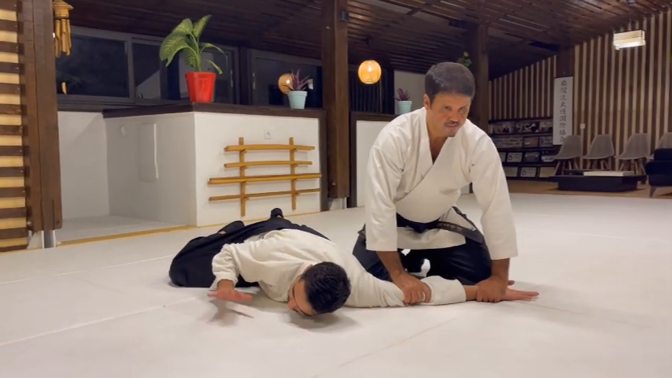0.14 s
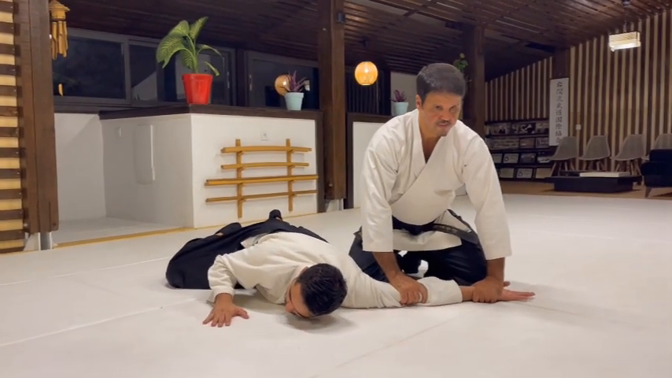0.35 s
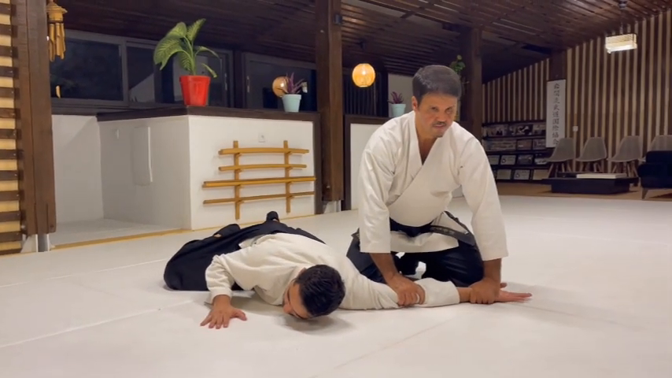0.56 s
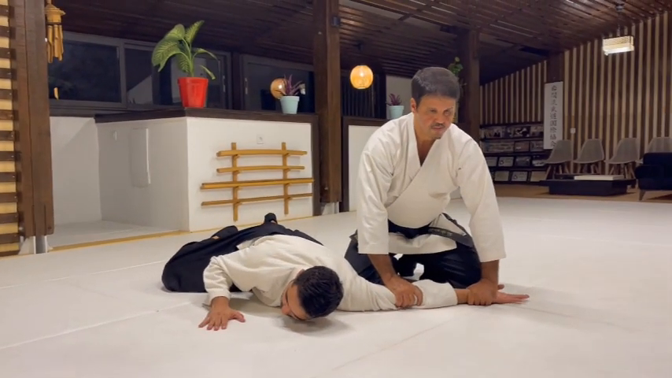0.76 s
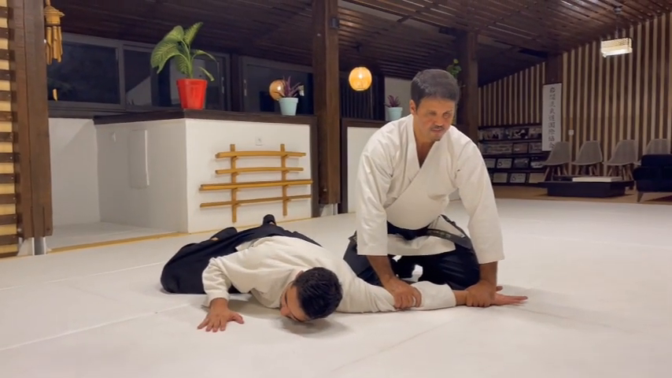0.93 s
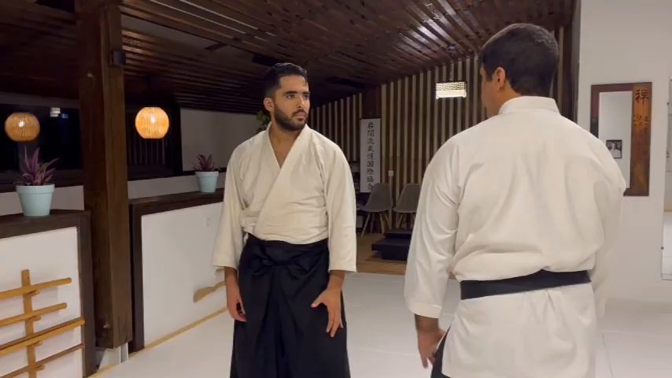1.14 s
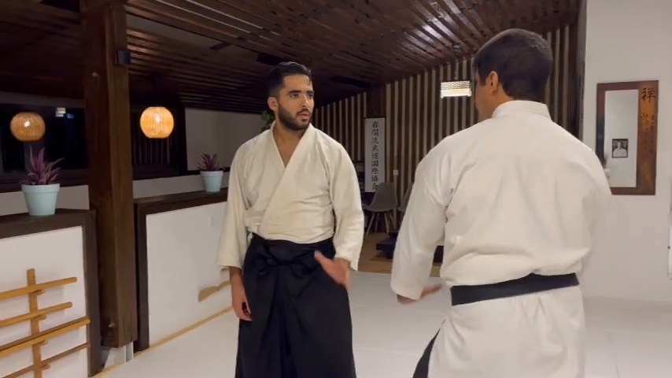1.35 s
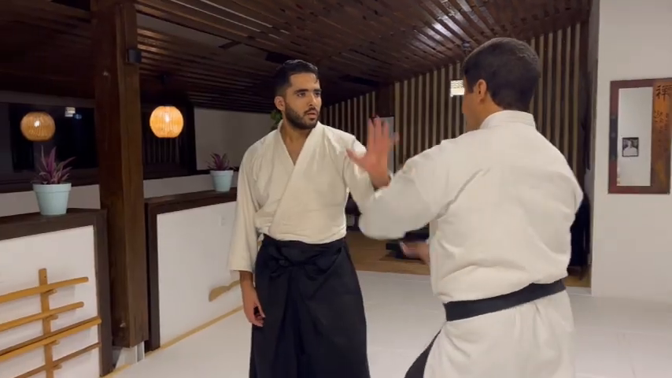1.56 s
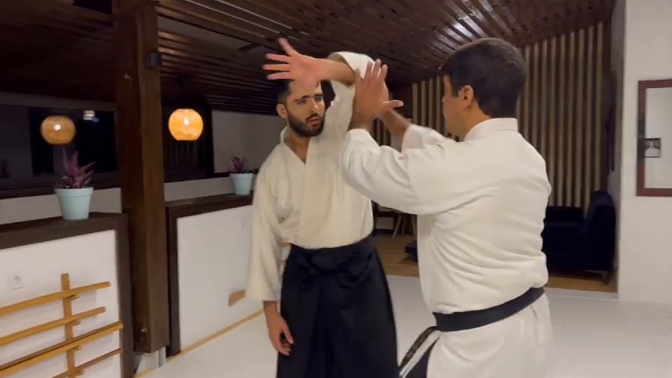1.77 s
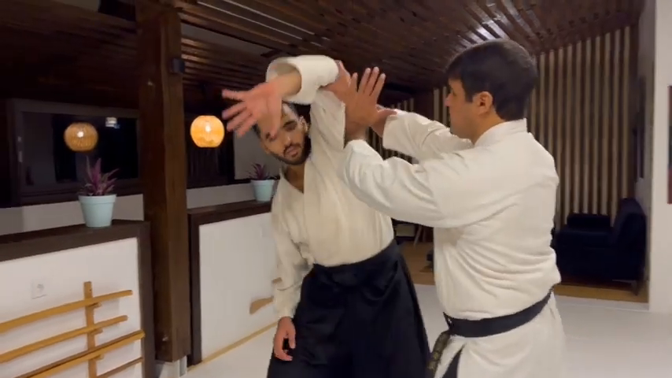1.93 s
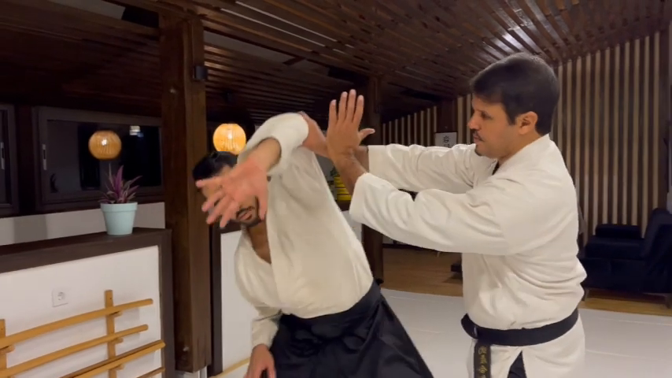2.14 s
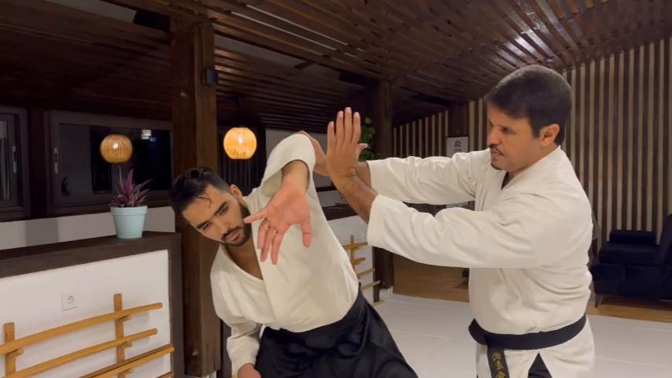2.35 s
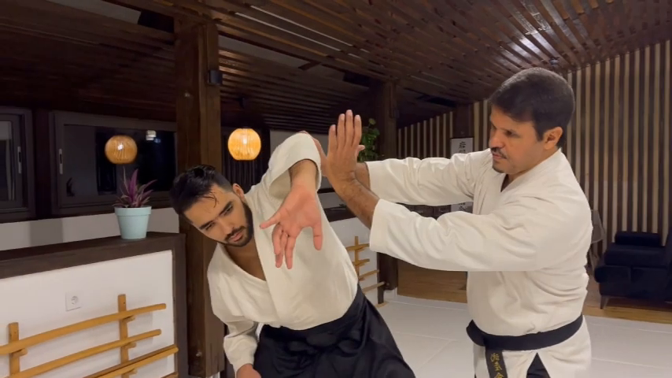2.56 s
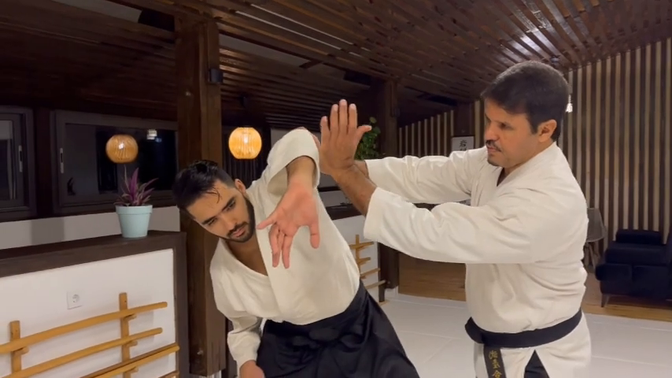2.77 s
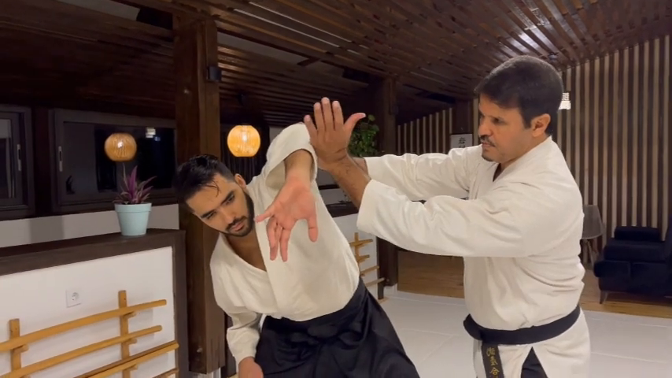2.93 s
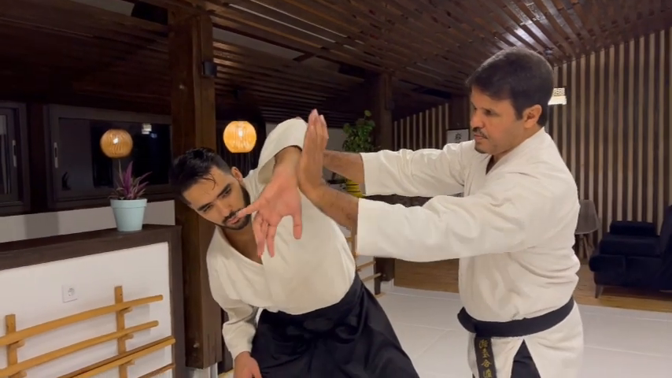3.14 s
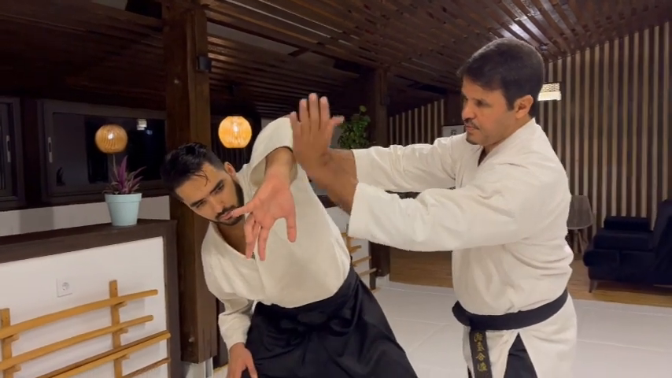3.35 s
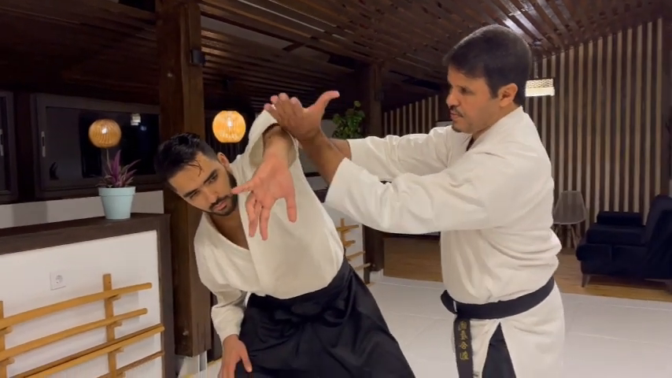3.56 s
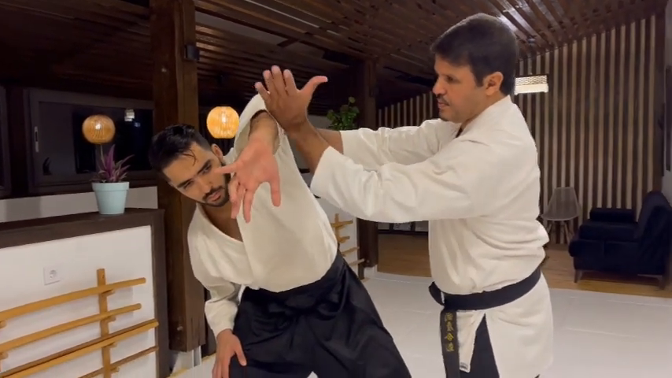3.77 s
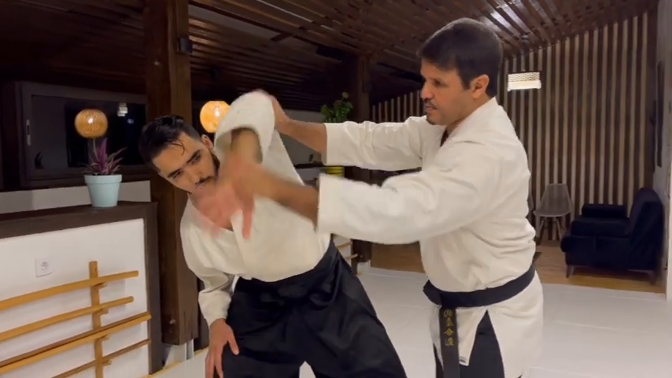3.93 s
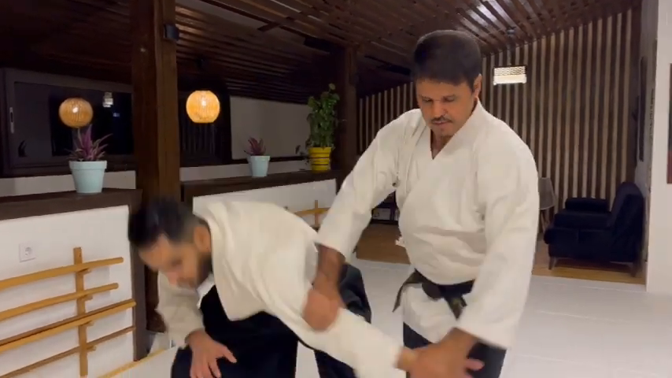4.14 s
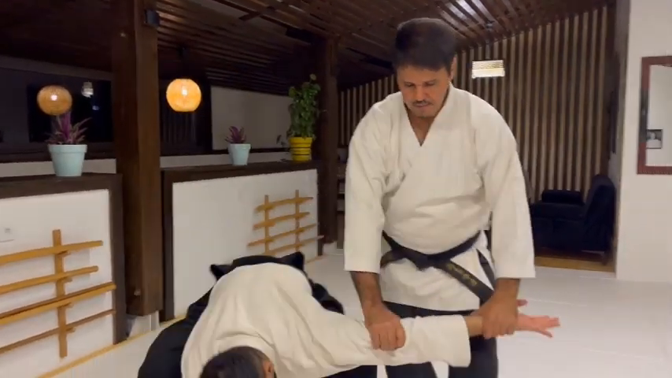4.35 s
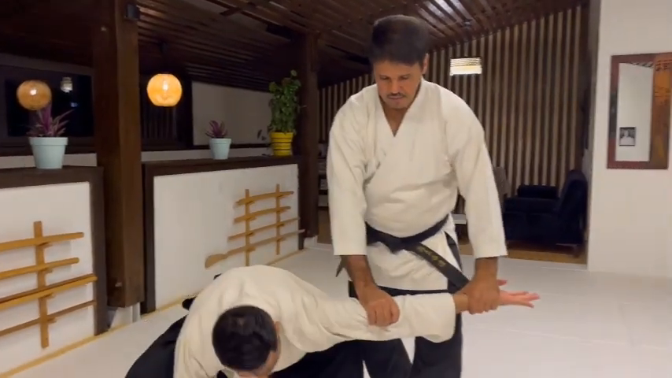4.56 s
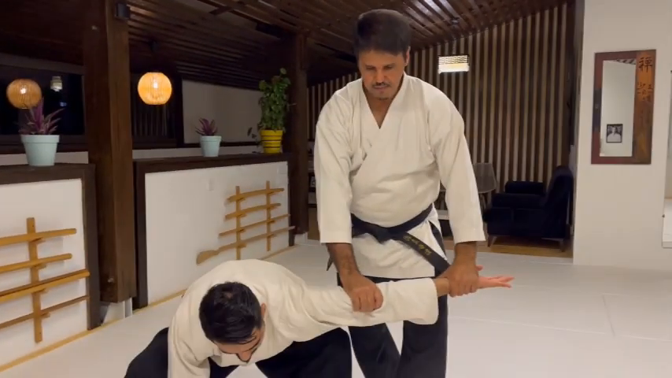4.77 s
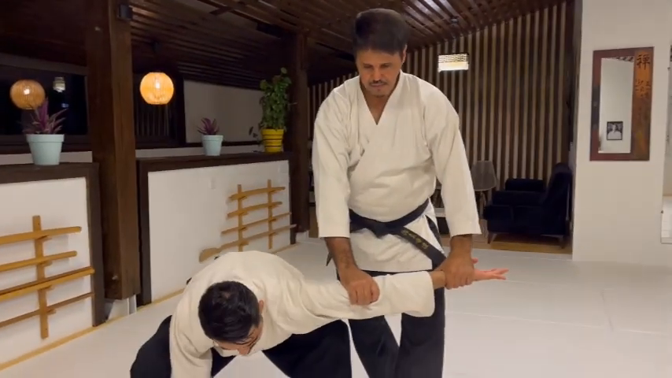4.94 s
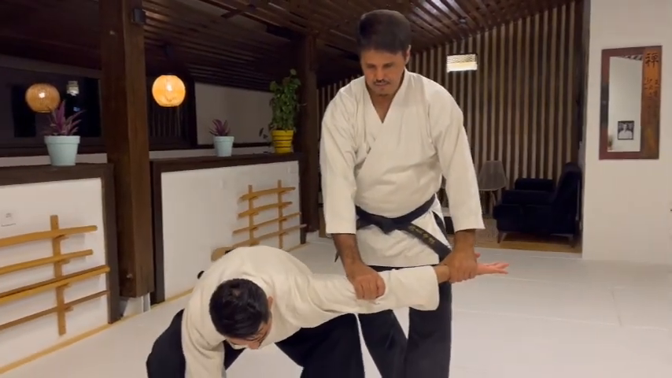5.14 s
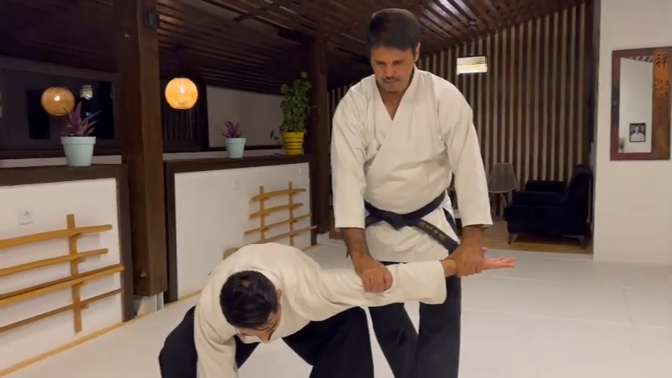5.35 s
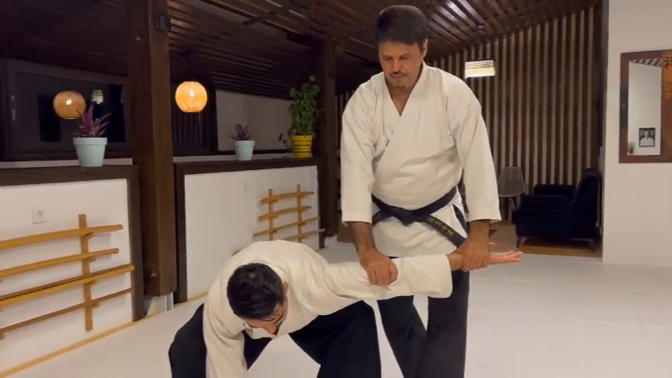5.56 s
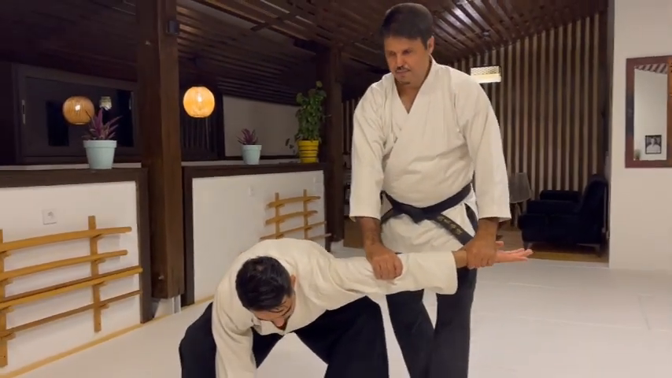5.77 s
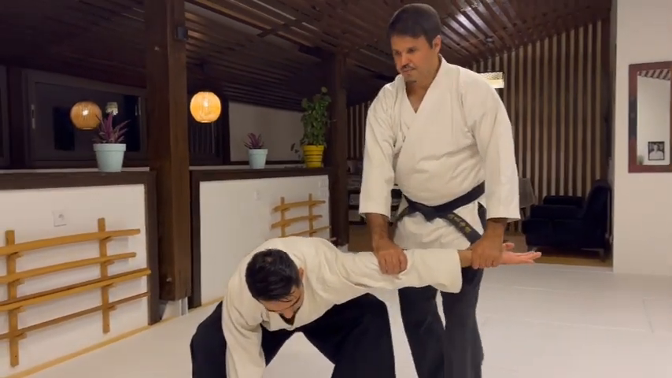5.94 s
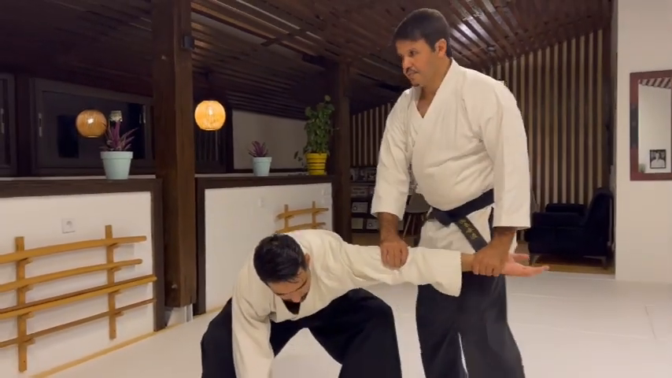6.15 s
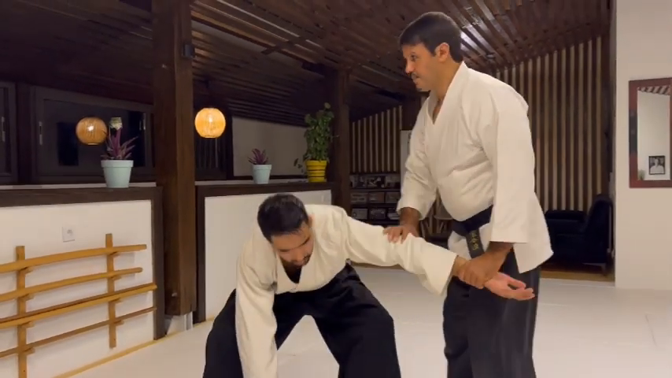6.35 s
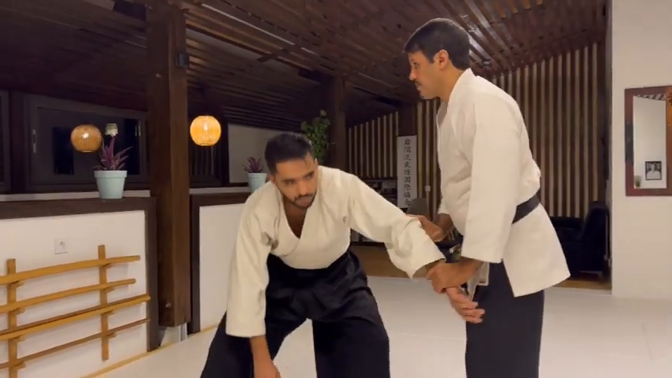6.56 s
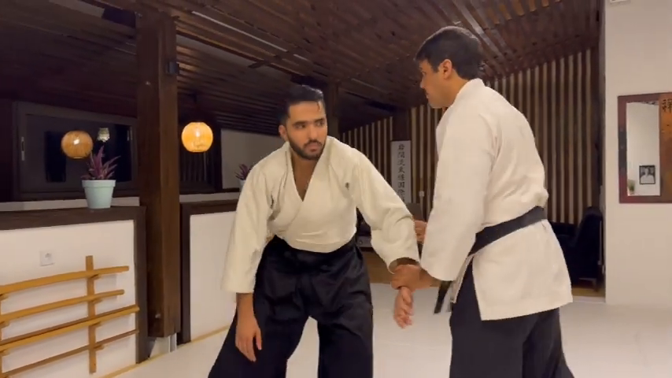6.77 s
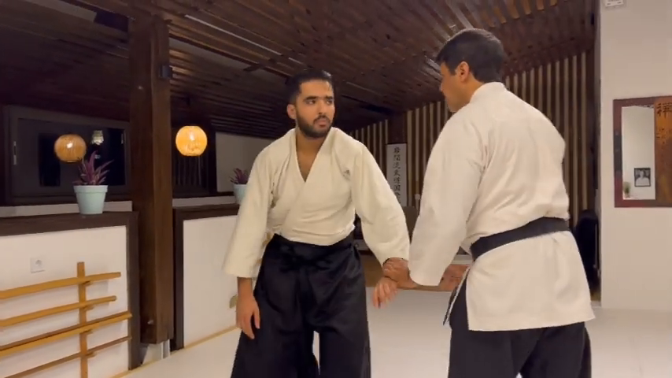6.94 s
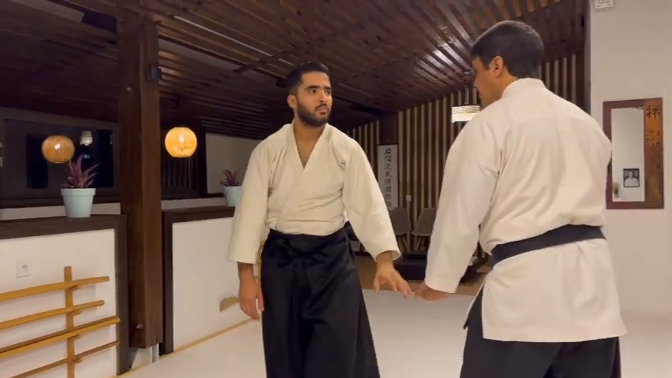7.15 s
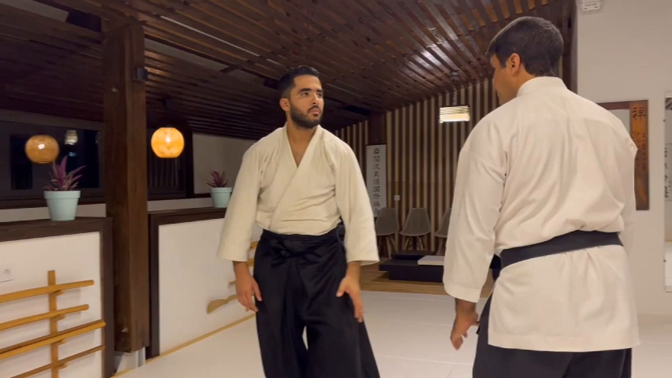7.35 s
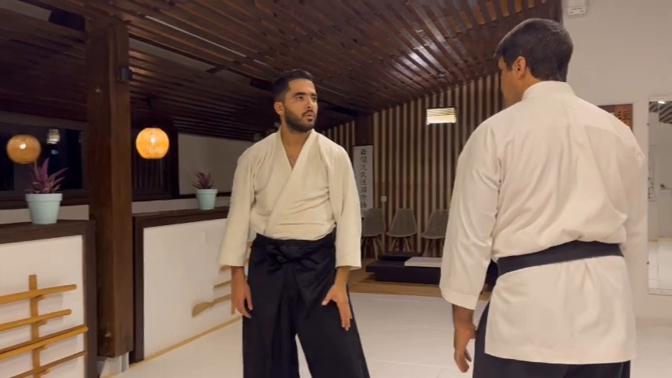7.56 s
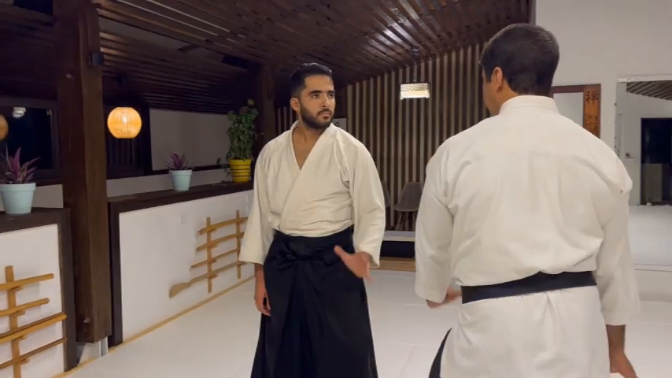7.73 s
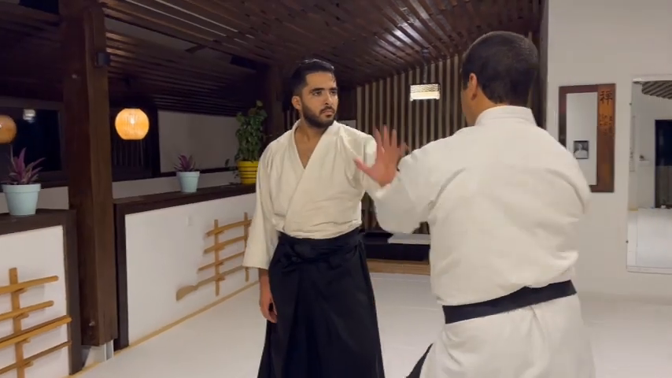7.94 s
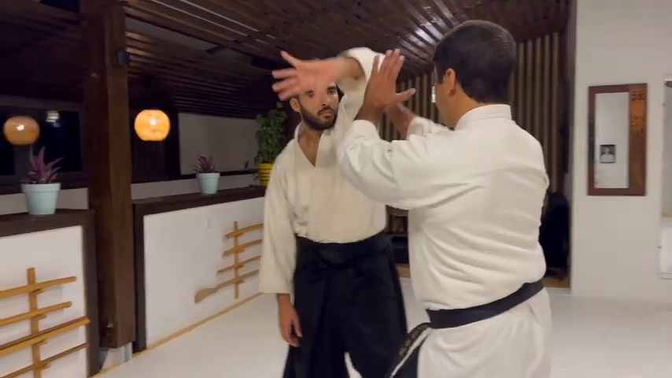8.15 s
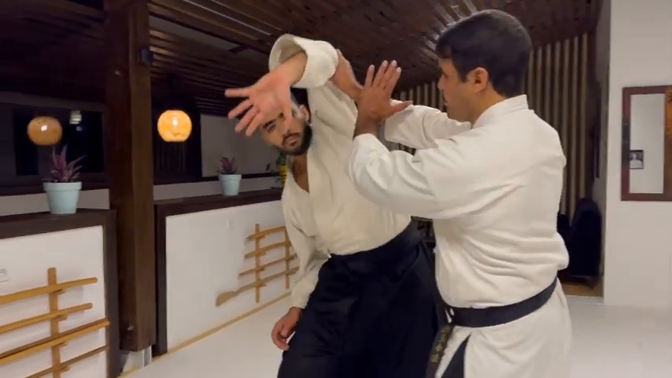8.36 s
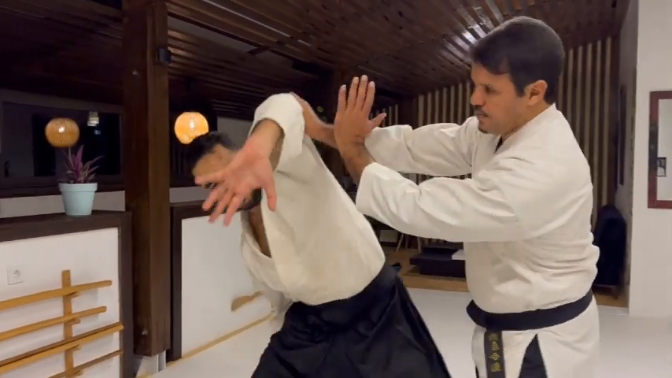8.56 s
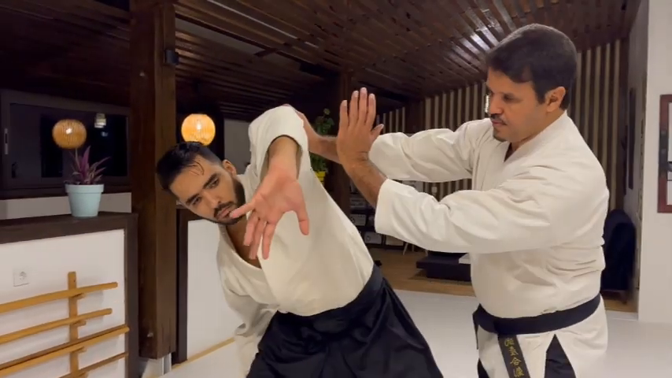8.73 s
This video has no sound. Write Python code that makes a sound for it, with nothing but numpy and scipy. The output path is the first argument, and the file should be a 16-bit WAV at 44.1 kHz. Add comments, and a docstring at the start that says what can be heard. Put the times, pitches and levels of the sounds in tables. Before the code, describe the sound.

Two people practise throws on mats, heard by close stereo microphones in a lively hall. One crisp slap, then cotton rustle, a brief sole squeak and a deep smack. Mat creaks tick before a huge crashing slam that overloads slightly and blooms into reverberation. Quiet jacket swishes and foot shuffles follow, then squeaking soles and a final weighty thump, over a faint low building rumble.

```python
"""A large, timber-roofed training hall, where two people practise throws and pins on tatami mats.
Hands, feet and bodies land with a smack that sweeps down into a thump, and the hall rings on.
Between landings, filtered friction noise makes heavy cotton jackets swish and bare soles skid;
short plucked tones make the mat cover slip and creak. A low rumble lies under it all,
and two close microphone ports hear it through a limiter."""
import sys
import numpy as np
from scipy import signal
from scipy.fft import rfft, irfft, next_fast_len
from scipy.io import wavfile
from scipy.ndimage import uniform_filter1d, minimum_filter1d

SR = 44100
rng = np.random.default_rng(int(sys.argv[2]) if len(sys.argv) > 2 else 0)


def wav_record(signal):
    """Record a signal, one row per channel, as 16-bit PCM in the file named by sys.argv[1]."""
    frames = np.transpose(np.atleast_2d(signal))
    bounded = np.clip(frames, -1, 1)
    # unit amplitude maps onto the largest positive 16-bit level
    quanta = np.round(bounded * 32767).astype(np.int16)
    wavfile.write(sys.argv[1], SR, quanta)


N = 392490
TIME = np.arange(N) / SR
# spectrum of air and cloth cracks: frequency_hz, relative_level_db
CRACK_SPECTRUM = [(150, 4.5), (600, 7.5), (1500, 6.5), (3000, -1), (4500, -5.5), (8000, -10.5),
                  (14000, -12)]


def gain_of(db):
    """Decibels to amplitude."""
    return 10 ** (np.asarray(db) / 20)


def evened(x):
    """Scales to rms 1."""
    return x / np.sqrt(np.mean(x ** 2) + 1e-20)


def read(points, hz):
    """Reads a spectrum on a log-frequency axis."""
    f, value = np.transpose(points)
    return np.interp(np.log(hz + 1), np.log(f + 1), value)


def level(rows):
    """A dB curve as a gain for every sample."""
    return gain_of(np.interp(TIME, *np.transpose(rows)))


def add(mix, s, sound):
    """Mixes a sound in at a time in seconds."""
    part = mix[:, max(round(s * SR), 0):][:, :sound.shape[1]]
    part += sound[:, :part.shape[1]]


def colour(x, tone, tilt_db=0, size=4096):
    """Causal, minimum-phase filter with the given spectrum, tilted per octave about 2 kHz."""
    hz = abs(np.fft.fftfreq(size, 1 / SR))
    tilt = tilt_db * np.log2(np.maximum(hz, 200) / 2000)
    log_gain = np.log(gain_of(read(tone, hz) + tilt))
    response = np.exp(np.conj(signal.hilbert(log_gain)))
    taps = np.fft.ifft(response).real[:size // 2]
    return signal.oaconvolve(x, taps)[:len(x)]


def spread(mid, side):
    """Diffuse sound on two close microphones: nearly alike in the bass, further apart above."""
    # side against mid: frequency_hz, level_db
    side_width = [(50, -26.5), (170, -14), (350, -7), (700, -1.5), (1400, -1), (5000, -5), (8500, -11),
                  (14000, -4.5)]
    side = colour(side, side_width)
    return np.array([mid + side, mid - side])


def rumble():
    """Low noise of the building, its level shifting now and then."""
    # level of the rumble: time_s, level_db
    rumble_levels = [(0, -53), (1.12, -56.5), (1.15, -50.5), (1.6, -42), (5.4, -44), (7.59, -40.5),
                     (7.63, -48.5), (7.95, -42.5)]
    # its spectrum: frequency_hz, relative_level_db
    rumble_spectrum = [(20, -36.5), (40, -5.5), (62, 3), (100, 0.5), (150, -7), (250, -14.5), (400, -24.5),
                       (800, -29), (2000, -37), (5000, -56.5), (14000, -68.5)]
    mid, side = (evened(colour(x, rumble_spectrum)) for x in rng.standard_normal((2, N)))
    return level(rumble_levels) * spread(mid, side)


def hump(u):
    """A smooth push that peaks at u = 1."""
    return u ** 2 * np.exp(1 - u ** 2)


def click(tilt_db):
    """A single impulse with the spectrum of a crack."""
    return evened(colour(signal.unit_impulse(4096), CRACK_SPECTRUM, tilt_db))


def hall(x, build_s=.006, gap_s=0.0012):
    """Dense reflections that build up quickly and die at each band's own speed, with a few resonances."""
    # decay by band: frequency_hz, t60_s
    decay_times = [(60, 0.925), (150, 0.7453), (400, 0.54), (900, 0.8), (3000, 0.75), (8000, 0.7161),
                   (14000, 0.51)]
    # spectrum of the reflections: frequency_hz, level_db
    hall_spectrum = [(30, -13.5), (70, -0.5), (140, -1.5), (300, -1), (600, -4), (1200, -2), (4000, 2.5),
                     (12000, 5)]
    # floor panels and hall resonances: frequency_hz, gain_at_resonance_db, t60_s
    resonances = [(98.4, 4.5, 0.6), (134.2, 4.5, 0.36), (165.5, 4.5, 0.62), (237.6, 3.5, 0.7),
                  (261.8, 7, 0.74), (300, 7.5, 0.7), (330, 2, .8), (392, -2.5, 0.85), (455, -3.5, 0.5),
                  (592, 7, 0.29), (706.5, 8.5, 0.78), (821, 4.5, 1), (968, -3.5, 0.76), (1300, -5.5, 1.5)]
    count = int(1.4 * SR)
    hz, t, z = signal.stft(rng.standard_normal((2, count)), SR, nperseg=256)
    decay = gain_of(-60 * t / read(decay_times, hz)[:, None])
    tails = signal.istft(z * decay, SR, nperseg=256)[1]
    t = TIME[:tails.shape[1]]
    tails = tails * (1 - np.exp(-np.maximum(t - gap_s, 0) / build_s))
    mid, side = (colour(tail / np.linalg.norm(tail), hall_spectrum) for tail in tails)
    for f, db, t60 in resonances:
        damping = np.log(1000) / t60
        ring = np.exp(-damping * t) * np.sin(2 * np.pi * (f * t + rng.random()))
        mid = mid + gain_of(db) * 2 * damping / SR * ring
    return signal.fftconvolve(x[None], spread(mid, side), axes=1)


def landings(smack_s=0.0021, crack_s=0.0021, direct_db=-0.5, direct_tilt_db=1):
    """Bending waves in the floor carry high notes fastest, so each blow arrives as a falling sweep."""
    # hands, feet and bodies landing: start_s, smack_db, thump_db, crack_db (before the direct offset),
    # crack_tilt_db_per_octave, period_growth_s_per_s, thump_peak_after_s, hall_db
    blows = [(0.264, -9, -8.5, -17, 2, 0.47, 0.0071, 0), (0.272, -32, -13, -33, 0.5, 0.68, 0.016, -2.5),
             (1.838, -30.5, -24, -47.5, -5, .6, 0.013, 1.5), (1.9, -29, -29, -44, 1, 0.74, 0.01, 6.5),
             (2.0871, -6.5, 2.5, -11.5, -1.5, 0.5, 0.011, -0.5),
             (2.152, -11.5, -8.5, -35, -10.5, 0.62, 0.0083, 1.5),
             (2.36, -44, -19, -46, -6, 0.605, .009, -6), (4.3535, 8.5, 6.5, 1, 0.5, 0.65, 0.0082, 6),
             (4.381, 0, -0.5, -6, 1, 0.72, 0.0068, 5.5), (4.55, -26, -19.5, -33, -3, .6, 0.0093, 4.5),
             (8.057, -27.5, -31, -34, -12, 0.616, 0.0071, 5.5),
             (8.34, -26, -25, -22.5, -5.5, 0.71, 0.011, 3), (8.4876, -0.5, 2, -7, -2.5, .49, 0.014, -2),
             (8.549, -40, -12, -32.5, -9, 0.49, 0.0087, 4.5)]
    # the sharper a blow's crack, the higher its sweep starts (this high for a crack of 0 dB)
    sweep_hz, crack_db_per_octave = 2300, 28
    out, t = np.zeros((2, N)), TIME[:4096]
    for s, smack_db, thump_db, crack_db, tilt_db, growth, thump_s, hall_db in blows:
        hz = sweep_hz * 2 ** (crack_db / crack_db_per_octave)
        turns = np.log1p(abs(growth) * hz * t) / abs(growth)
        # the skin smacks the cover, then the weight behind it arrives
        smack = gain_of(smack_db) * hump(t / smack_s)
        thump = gain_of(thump_db) * hump(t / thump_s) ** 2
        sweep = (smack + thump) * np.sin(2 * np.pi * turns)
        # air squeezed out from under the skin cracks first, brightest on the direct path
        fade = np.exp(-t / crack_s)
        strength = gain_of(crack_db) * fade.std()
        air = rng.standard_normal(len(t)) * fade
        crack = strength * evened(colour(air, CRACK_SPECTRUM, tilt_db + direct_tilt_db))
        add(out, s, (sweep + gain_of(direct_db) * crack)[None])
        # summed over all directions, the crack reaches the hall with a smooth spectrum
        add(out, s, gain_of(hall_db) * hall(sweep + strength * click(tilt_db)))
    return out


def gesture(start_s, rise_s, hold_s, fade_db_per_s, curve=1.07):
    """Gain of one movement: it gathers speed, holds, and dies away."""
    swell_db = 19.5  # gained during the rise
    to_go = np.clip((start_s + rise_s - TIME) / rise_s, 0, 10)
    since_hold_s = np.maximum(TIME - start_s - rise_s - hold_s, 0)
    return gain_of(-swell_db * to_go ** curve - fade_db_per_s * since_hold_s)


def effort(rows, fade_db_per_s, idle_db=-np.inf):
    """Overlapping movements (start_s, rise_s, hold_s, level_db) add in power to the idle stirring."""
    # from this time on, a faint cloth and sole noise never quite stops
    stirring_from_s = 1.13
    power = sum((gain_of(db) * gesture(*timing, fade_db_per_s)) ** 2 for *timing, db in rows)
    return np.sqrt(power + gain_of(idle_db) ** 2 * (TIME > stirring_from_s))


def rubbing(tone, per_s, uneven_db, side_db, folds_db):
    """Friction as many tiny catches of uneven size, spread over the two microphones."""
    catches = rng.standard_normal((2, N)) * (rng.random((2, N)) < per_s / SR)
    catches = catches * gain_of(uneven_db * np.minimum(rng.exponential(1, (2, N)), 4))
    # the colour drifts as folds of cloth open and close
    z = signal.stft(catches, nperseg=512)[2]
    folds = uniform_filter1d(rng.standard_normal(z.shape[1:]), size=7, axis=0)  # over frequency
    folds = evened(uniform_filter1d(folds, size=28, axis=1))  # over time
    catches = signal.istft(z * gain_of(folds_db * folds), nperseg=512)[1][:, :N]
    mid, side = (evened(colour(c, tone)) for c in catches)
    return spread(mid, gain_of(side_db) * side)


def movement():
    """Friction noise follows each effort: jackets swish, trousers rasp, feet shuffle and skid."""
    # one move of the pair (a reach, a turn, a step, a rise):
    # start_s, rise_s, hold_s, jackets_db, feet_db, trousers_db
    moves = [(1.128, 0.018, 0.55, -69, -57.5, -69.5), (1.475, 0.2, 0.29, -48.5, -48.5, -58.5),
             (2.308, 0.087, 0.022, -46.5, -49.5, -74), (2.59, 0.072, 0.11, -71, -72.5, -62),
             (3.048, 0.068, 0.012, -47.5, -62, -59.5), (3.387, 0.056, 0.0067, -60.5, -56.5, -59),
             (3.49, 0.19, 0.24, -77, -49.5, -66), (3.821, 0.092, .015, -37, -46, -74),
             (4.022, .11, 0.2, -47.5, -45, -63), (4.442, 0.052, 0.052, -61, -35, -59),
             (5.296, 0.016, 0.014, -58.5, -66, -75), (5.433, 0.41, 0.3, -53.5, -50.5, -54.5),
             (6.295, 0.064, 0.19, -58.5, -60, -70), (6.584, .1, 0.053, -51.5, -54.5, -62.5),
             (6.705, 0.18, 0.4, -54.5, -51.5, -55.5), (7.35, 0.093, 0.051, -49, -48.5, -50.5),
             (7.63, 0.2, 0.23, -59, -51.5, -62), (8.039, 0.0083, 0.19, -46, -44.5, -57),
             (8.293, 0.027, 0.014, -45, -42.5, -64.5), (8.402, 0.046, .03, -56, -41.5, -70),
             (8.475, 0.028, .02, -41.5, -43, -32)]
    # a pivoting sole skids over the mat: start_s, rise_s, hold_s, level_db
    skid_moves = [(1.8, 0.045, .03, -45), (1.93, 0.028, 0.1, -39), (2.06, 0.055, 0.0087, -31),
                  (8.19, 0.067, .04, -39.5), (8.33, 0.025, .015, -32)]
    # spectra of the four rubbing sounds: frequency_hz, relative_level_db
    swish_spectrum = [(300, -41.5), (1500, 4), (3500, 4.5), (6000, 2.5), (8500, 6.5), (14000, 2.5)]
    rasp_spectrum = [(400, -26.5), (1100, 0), (2200, 5.5), (3200, -7.5), (4500, -8.5), (9000, -22.5)]
    shuffle_spectrum = [(100, -5), (300, 6.5), (700, 3.5), (1400, -4), (2400, -10), (4000, -11.5),
                        (10000, -18.5)]
    skid_spectrum = [(200, -11), (430, -5.5), (600, -0.5), (780, -9.5), (1100, -9), (2000, -27),
                     (5000, -38)]
    start, rise, hold, jackets_db, feet_db, trousers_db = np.transpose(moves)
    # after a move each rubbing sound dies away at its own speed
    jackets = effort(zip(start, rise, hold, jackets_db), fade_db_per_s=102, idle_db=-87)
    feet = effort(zip(start, rise, hold, feet_db), fade_db_per_s=76, idle_db=-76.5)
    trousers = effort(zip(start, rise, hold, trousers_db), fade_db_per_s=95, idle_db=-86.5)
    skid = effort(skid_moves, fade_db_per_s=220)
    return (jackets * rubbing(swish_spectrum, per_s=12000, uneven_db=0.5, side_db=-6, folds_db=0.43)
            + trousers * rubbing(rasp_spectrum, per_s=3000, uneven_db=-0.5, side_db=-5.5, folds_db=1.9)
            + feet * rubbing(shuffle_spectrum, per_s=6000, uneven_db=1.5, side_db=-5.0, folds_db=2.0)
            + skid * rubbing(skid_spectrum, per_s=6000, uneven_db=1.5, side_db=-4.0, folds_db=-0.5))


def snaps(hall_db=0):
    """Short bursts of fibre noise, each with the hall's answer."""
    # cloth snapping taut and hands grabbing sleeves: start_s, level_db, t60_s, tilt_db_per_octave
    snap_table = [(1.555, -36.5, 0.016, -1.5), (1.639, -29, 0.041, -5.5), (1.648, -31, 0.046, -2),
                  (2.071, -29, 0.11, -1), (2.084, -15.5, 0.018, -2.5), (2.153, -25, 0.2, 2),
                  (2.804, -45, 0.014, 2.5), (3.135, -40.5, 0.048, -6), (5.305, -42.5, 0.082, -5),
                  (6.66, -35.5, 0.04, -8.5), (7.938, -34, 0.017, 0), (8.055, -31, 0.061, -1.5),
                  (8.4715, -29, 0.083, -0.5)]
    out, t = np.zeros((2, N)), TIME[:4096]
    for s, db, t60, tilt_db in snap_table:
        fibres = evened(colour(rng.standard_normal(len(t)), CRACK_SPECTRUM, tilt_db))
        burst = fibres * gain_of(db - 60 * t / t60)
        add(out, s, burst[None])
        add(out, s, gain_of(hall_db) * hall(burst.std() * click(tilt_db)))
    return out


def pluck(db, hz, cycles, grit_db=-22):
    """The mat cover lets go and swings, strongest after the given cycles, with a little grit."""
    t = TIME[:2048]
    grit = gain_of(grit_db) * colour(rng.standard_normal(len(t)), CRACK_SPECTRUM)
    swing = np.sin(2 * np.pi * hz * t) + grit
    return gain_of(db) * hump(t * hz / cycles) * swing


def placed(x, hall_db):
    """Direct sound plus the hall's answer."""
    out = gain_of(hall_db) * hall(x)
    out[:, :len(x)] += x
    return out


def slips():
    """Each slip or creak plucks the mat cover."""
    # a sole slipping on the mat cover: start_s, peak_db, pitch_hz
    slip_table = [(1.9357, -15.5, 563), (1.9935, -18, 660), (2.0177, -21.5, 610), (3.894, -29.5, 770),
                  (4.208, -34.5, 670), (5.304, -35, 484), (6.659, -43.5, 606), (8.3383, -16.5, 720),
                  (8.3568, -19.5, 650), (8.372, -20.5, 740)]
    # the cover creaks in dry ticks under a loaded foot: start_s, peak_db
    creak_table = [(3.5542, -33.5), (3.577, -32.5), (3.599, -27.5), (3.6291, -24.5), (3.656, -24),
                   (3.697, -38), (3.79, -24), (3.823, -29.5), (5.147, -42.5)]
    out = np.zeros((2, N))
    for s, db, hz in slip_table:
        add(out, s, placed(pluck(db, hz, cycles=1.56), hall_db=-0.2))
    for s, db in creak_table:
        add(out, s, placed(pluck(db, hz=1500, cycles=0.78), hall_db=-6.5))
    return out


def scene():
    """Everything on the mats, and the hall around it."""
    # the level dips briefly: time_s, half_length_s, depth (0-1)
    brief_dip = (7.611, .007, .95)
    s, half_s, depth = brief_dip
    dip = 1 - depth * np.exp(-((TIME - s) / half_s) ** 2)
    return (rumble() + landings() + movement() + snaps() + slips()) * dip


def ports(x):
    """The two microphone ports differ slightly in level and arrival time."""
    # level between the ports: frequency_hz, left_minus_right_db
    port_balance = [(60, 0.7), (250, 1.5), (600, 1.95), (2000, 0.7), (4500, 3), (8000, 1.7), (14000, -0.7)]
    # phase between the ports: frequency_hz, left_lead_radians
    port_phase = [(60, .01), (1000, 0.13), (4000, 1), (8500, 1.04), (11500, 2.07), (14000, .7)]
    size = next_fast_len(N + 4096)
    hz = np.fft.rfftfreq(size, 1 / SR)
    # half of each difference goes to either side
    left = gain_of(read(port_balance, hz) / 2) * np.exp(.5j * read(port_phase, hz))
    return irfft(rfft(x, size) * np.array([left, 1 / left]), size)[:, :N]


def limiter(x, limit_db=-.2, hold_s=0.09, release_db_per_s=62):
    """Ducks at once on a peak, holds, then lets the hall's tail swell back."""
    over_db = np.maximum(20 * np.log10(abs(x).max(0) + 1e-9) - limit_db, 0)
    size = max(int(hold_s * SR), 3)
    held_db = -minimum_filter1d(-over_db, size, origin=(size - 1) // 2)
    fall = TIME * release_db_per_s
    duck_db = np.maximum.accumulate(held_db + fall) - fall
    return x / gain_of(uniform_filter1d(duck_db, size=48))  # rounded over about 1 ms


def record(dry):
    """Microphone colour, limiter, clipping of what slips through, and the band limit."""
    # microphone port: frequency_hz, level_db
    mic_response = [(20, -0.5), (9000, 0), (9800, -1), (10200, -14.5), (10700, 2), (11300, 7),
                    (12200, -6.5), (13200, -17), (15500, -18)]
    edge_hz = 15900
    coloured = np.array([colour(x, mic_response) for x in dry])
    heard = np.clip(limiter(ports(coloured)), -1, 1)
    low_pass = signal.firwin(511, edge_hz, window=("kaiser", 9), fs=SR)
    return signal.oaconvolve(heard, low_pass[None], "same")


dry = scene()
out = record(dry)
wav_record(out)
```